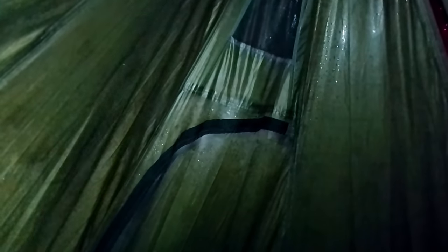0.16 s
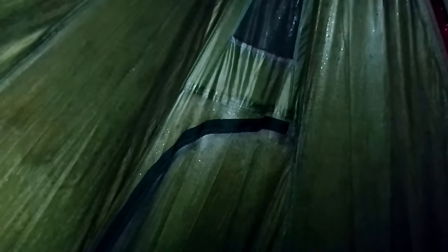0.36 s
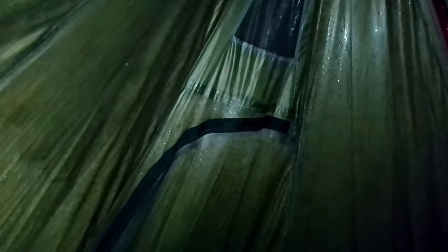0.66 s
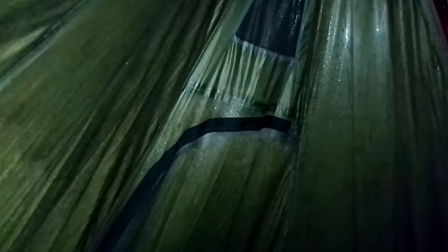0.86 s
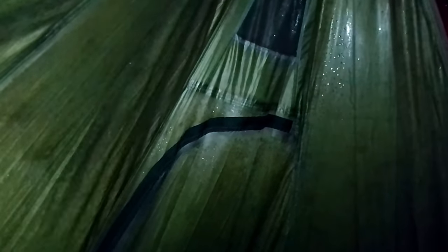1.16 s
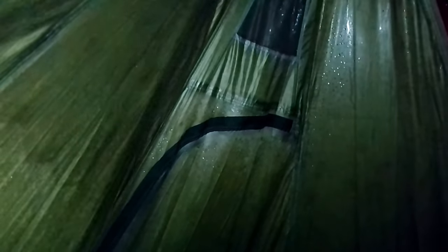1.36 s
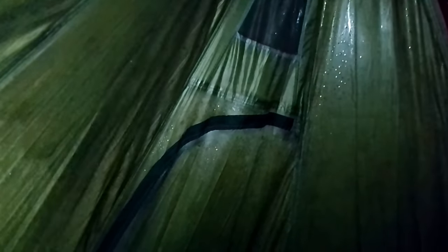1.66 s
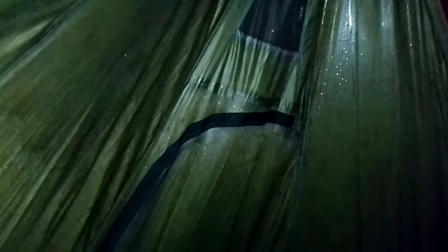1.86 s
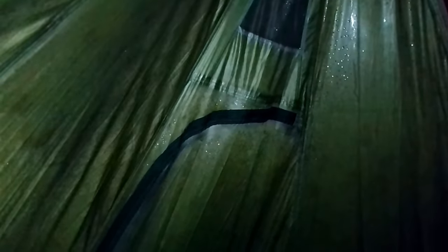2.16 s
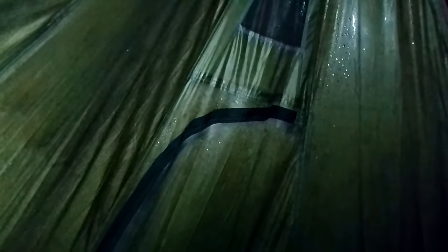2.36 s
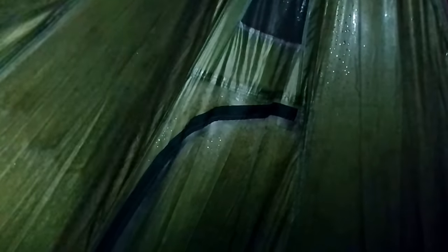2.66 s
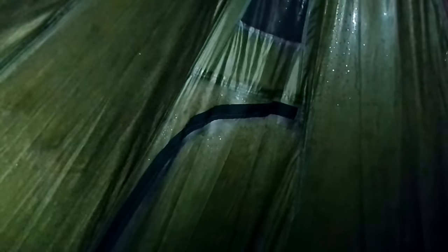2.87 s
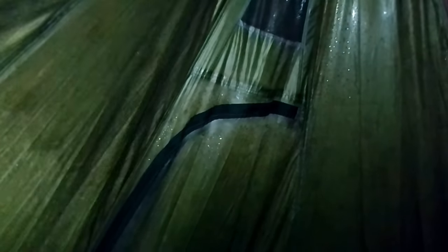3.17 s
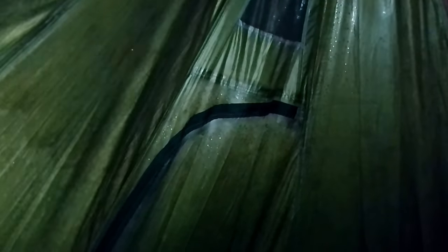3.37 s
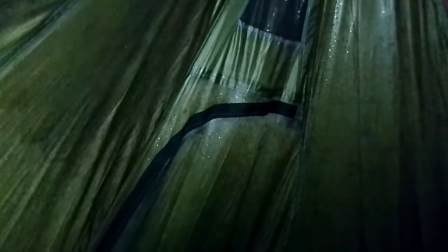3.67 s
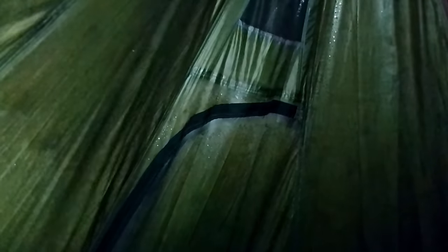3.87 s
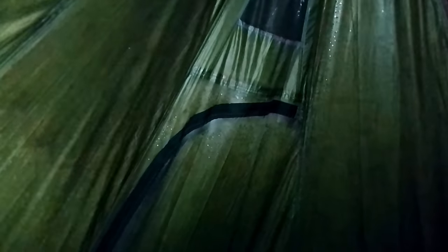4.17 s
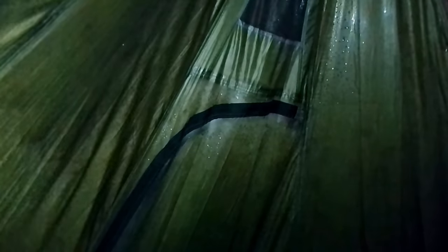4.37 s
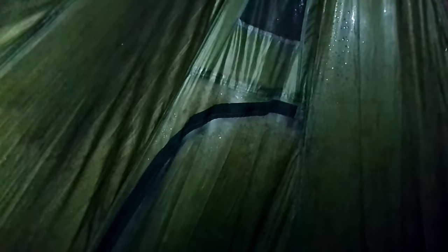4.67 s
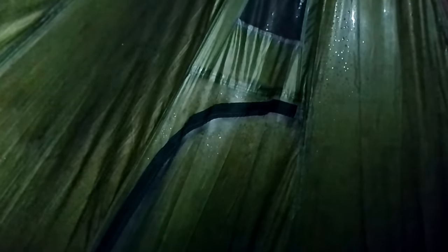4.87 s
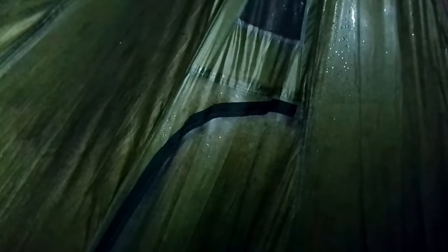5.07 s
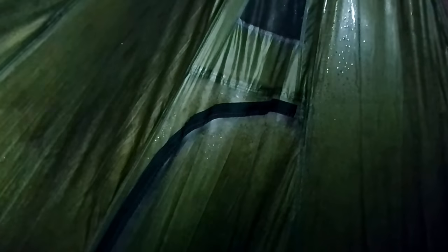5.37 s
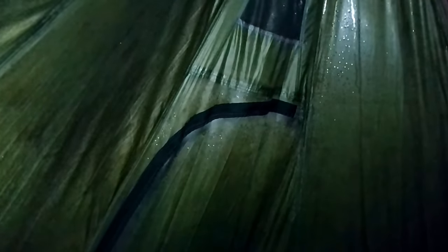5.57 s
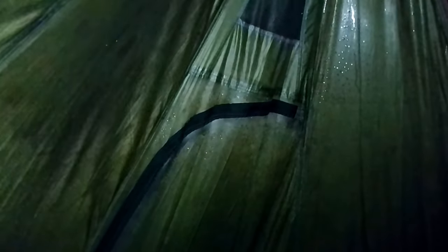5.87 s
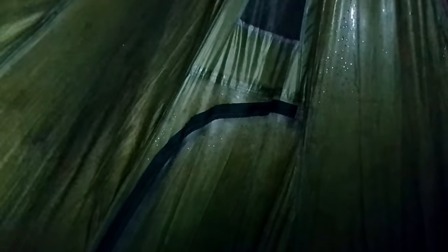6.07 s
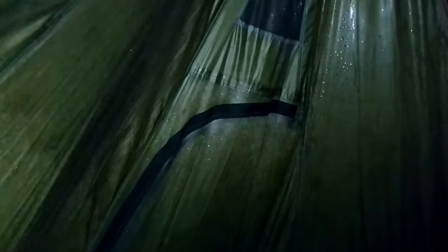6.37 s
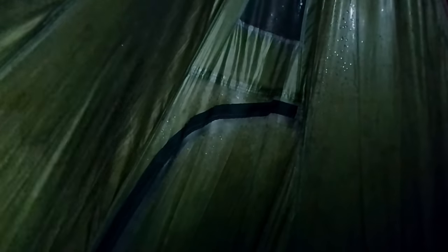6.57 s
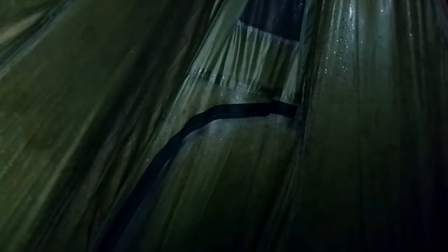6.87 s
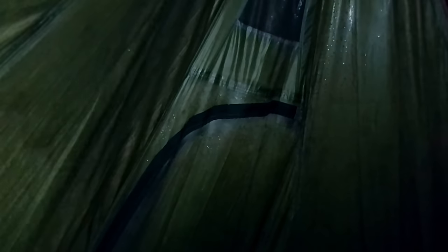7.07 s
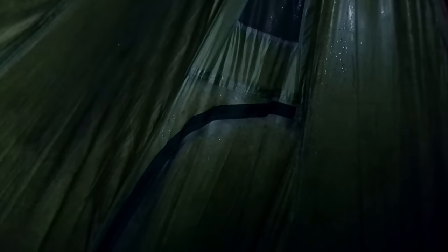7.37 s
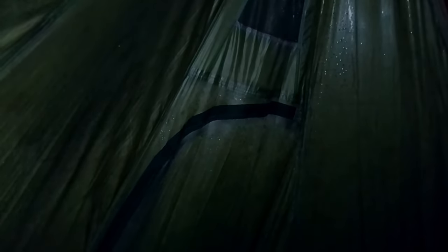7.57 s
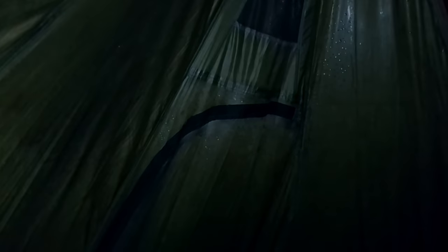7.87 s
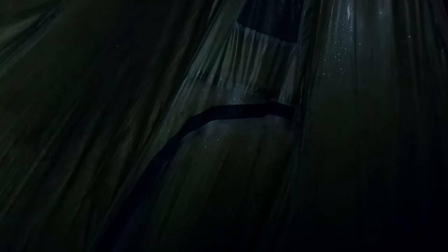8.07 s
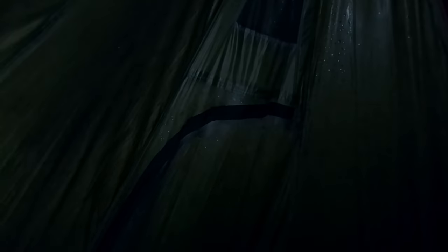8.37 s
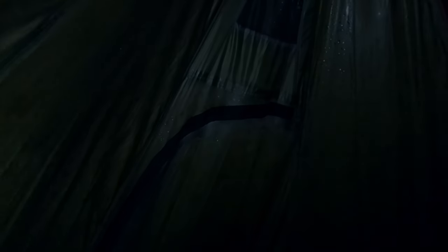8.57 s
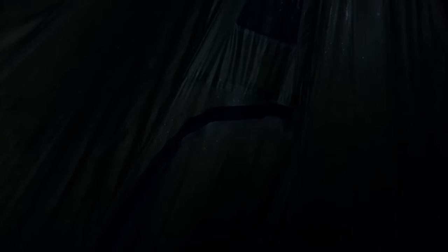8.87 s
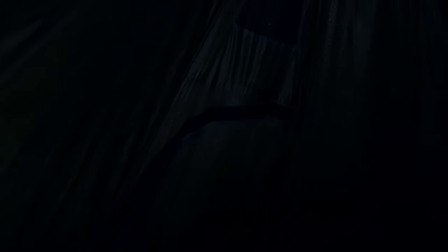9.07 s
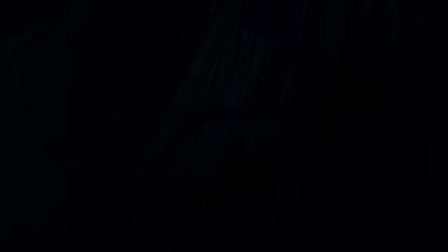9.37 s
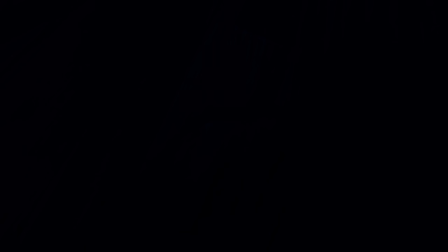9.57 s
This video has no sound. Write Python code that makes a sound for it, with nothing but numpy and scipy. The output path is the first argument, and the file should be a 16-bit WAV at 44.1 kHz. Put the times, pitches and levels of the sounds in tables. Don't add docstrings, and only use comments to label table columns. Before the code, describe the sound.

Inside a tent at night, stiff nylon walls crinkle, pop and crack in gusts above a soft distant wind roar, ending in a fade.

```python
import sys
import numpy as np
from scipy import signal
from scipy.fft import rfft, irfft
from scipy.io import wavfile
from scipy.ndimage import uniform_filter1d

SR = 44100
rng = np.random.default_rng(int(sys.argv[2]) if len(sys.argv) > 2 else 0)


def put_to_file(sound):
    columns = np.atleast_2d(sound).T
    safe = np.clip(columns, -1, 1)
    whole_steps = np.round(safe * 32767)
    wavfile.write(sys.argv[1], SR, whole_steps.astype(np.int16))


def invert_db(level):
    return 10 ** (np.asarray(level, dtype=float) / 20)


N = 429093


def evened(x):
    return x / np.sqrt(np.mean(x ** 2) + 1e-20)


def peaked(x):
    return x / (abs(x).max() + 1e-20)


def read(points, hz):
    f, value = np.transpose(points)
    return np.interp(np.log(hz + 1), np.log(f + 1), value)


def curve(points):
    s, db = np.transpose(points)
    return np.interp(np.arange(N) / SR, s, db)


def equalized(x, spectrum):
    gain = invert_db(read(spectrum, np.fft.rfftfreq(len(x), 1 / SR)))
    return irfft(rfft(x) * gain, len(x))


def colour(x, spectrum):
    return evened(equalized(x, spectrum))


def ring(x, hz, width):
    r = np.exp(-np.pi * width / SR)
    return signal.lfilter([1, -1], [1, -2 * r * np.cos(2 * np.pi * hz / SR), r * r], x)


def band(x, lo_hz, hi_hz):
    edges = [lo_hz, np.clip(hi_hz, 1.1 * lo_hz, 20000)]
    return peaked(signal.sosfilt(signal.butter(2, edges, "band", fs=SR, output="sos"), x))


def highpassed(x, hz):
    return signal.sosfilt(signal.butter(2, hz, "high", fs=SR, output="sos"), x)


def decay(t, t60):
    return invert_db(-60 * t / t60)


def add(mix, s, sound):
    part = mix[round(s * SR):][:len(sound)]
    part += sound[:len(part)]


def turbulence(spectrum, patchy_db, size=1024):
    frames, hz = 4 * N // size + 5, np.fft.rfftfreq(size, 1 / SR)
    a, b, patches = rng.standard_normal((frames, len(hz), 3)).T
    patches = uniform_filter1d(patches, size=10, axis=0)
    patches = evened(uniform_filter1d(patches, size=12, axis=1))
    z = (a + 1j * b) * invert_db(read(spectrum, hz)[:, None] + patchy_db * patches)
    return evened(signal.istft(z, nperseg=size, noverlap=3 * size // 4)[1][:N])


# (time [s], level [dB])
WIND_GUSTS = [(0.0, 0.5), (1.7, 1), (2.2, 2.5), (2.5, 2), (3.5, 1), (4.5, 1), (5.5, 1), (6.5, 2.5),
              (7.3, 5), (8.3, 6), (8.9, 7), (9.1, 4), (9.73, 7)]
# (time [s], swell [dB], half length [s])
CANOPY_HEAVES = [
    (0.037, 14, 0.02),
    (2.193, 2, 0.19),
    (4.2, 0.5, 0.18),
    (5.63, 5, 0.054),
    (5.754, 12, 0.19),
    (8.07, 5, 0.071),
    (8.541, 1, 0.27),
    (8.943, 11, 0.27),
]
# (frequency [Hz], level [dB per Hz])
ROAR_SPECTRUM = [(250, -24.5), (430, -3.5), (550, -6), (603, -3.5), (1140, -1), (1790, -4), (2030, -6),
                 (3090, -14.5), (3350, -17.5), (5000, -24.5), (6500, -34), (11000, -120)]
# (frequency [Hz], level [dB per Hz])
BOOM_SPECTRUM = [(97, -64), (165, -37.5), (186, -17), (242, -1), (339, 3), (453, -10), (480, -17.5),
                 (620, -34.5), (1060, -120)]
# (frequency [Hz], level [dB per Hz])
RUMBLE_SPECTRUM = [(18, -47.5), (30, -17), (68, 2.5), (102, 8), (124, -11), (160, -23.5), (210, -25),
                   (350, -120)]


def wind():
    t, gust = np.arange(N) / SR, curve(WIND_GUSTS)
    heave = sum(db * np.clip(1 - abs(t - s) / half, 0, 1) for s, db, half in CANOPY_HEAVES)
    roar = invert_db(-64 + gust) * turbulence(ROAR_SPECTRUM, patchy_db=1.36)
    boom = turbulence(BOOM_SPECTRUM, patchy_db=1.74, size=4096)
    boom = boom * invert_db(-72 + 1.04 * gust + heave)
    rumble = turbulence(RUMBLE_SPECTRUM, patchy_db=2.0, size=4096)
    rumble = rumble * invert_db(-91.5 + 0.47 * gust + 0.48 * heave)
    return roar + boom + rumble


def flap(peak_db, hz, t60):
    t = np.arange(SR // 4) / SR
    onset = 1 - np.exp(-t / 0.0011)
    return invert_db(peak_db) * decay(t, max(t60, .01)) * onset * np.sin(2 * np.pi * hz * t)


# (time [s], peak [dB], frequency [Hz], t60 [s])
CANOPY_FLAPS = [(2.026, -50.5, 320, 0.059), (5.596, -67, 588, 0.086), (5.763, -38, 338, 0.037),
                (6.301, -65, 330, 0.095), (7.651, -64, 385, 0.11), (8.336, -40.5, 296, 0.084),
                (8.739, -35.5, 336, 0.032), (8.874, -33.5, 322, 0.029), (5.758, -51.5, 126, 0.084),
                (8.328, -60, 86.1, 0.079), (8.868, -65.5, 75.4, 0.077)]


def flaps():
    out = np.zeros(N)
    for s, *row in CANOPY_FLAPS:
        add(out, s + 0.0042, flap(*row))
    return out


# (start [s], end [s], frequency [Hz], level [dB])
SEAM_HUMS = [
    (2.051, 2.207, 2890, -73),
    (5.8, 6.45, 3350, -76.5),
    (8.34, 8.82, 275, -58),
]


def seams():
    out = np.zeros(N)
    for start, end, hz, db in SEAM_HUMS:
        size = round((end - start) * SR)
        hum = evened(ring(rng.standard_normal(SR)[:size], hz, 37))
        add(out, start, invert_db(db) * signal.windows.tukey(size, .3) * hum)
    return out


def grains(per_s, spread_db, t60, clump_db):
    clumps = evened(uniform_filter1d(rng.standard_normal(N), size=500))
    size = invert_db(spread_db * np.minimum(rng.exponential(1, N), 3) + clump_db * clumps)
    hits = size * (rng.random(N) < per_s / SR)
    puffs = signal.lfilter([1], [1, -invert_db(-60 / (t60 * SR))], hits)
    return evened(puffs * rng.standard_normal(N))


# (time [s], level [dB])
SLIDE_LEVEL = [(0.0, -63), (0.34, -61.5), (0.5, -65), (0.85, -61.5), (1.2, -65.5), (1.95, -70),
               (2.13, -64.5), (2.35, -68.5), (2.7, -65), (3.1, -66), (5.4, -71.5), (5.58, -60.5),
               (6.36, -65.5), (7.0, -68), (7.6, -51), (8.03, -61.5), (8.32, -67), (9.73, -62.5)]
# (frequency [Hz], level [dB per Hz])
RUSTLE_SPECTRUM = [(2940, -27.5), (5000, -13.5), (6140, -9.5), (9190, 2.5), (9710, 1.5), (12200, -6.5),
                   (15100, -10), (16000, -13), (16200, -39), (16500, -46)]
# (frequency [Hz], level [dB per Hz])
SCRAPE_SPECTRUM = [(2000, -10.5), (3000, 0), (5500, -4), (7000, -4), (12000, -29.5), (16000, -48)]


def rustle():
    gust, slide = curve(WIND_GUSTS), curve(SLIDE_LEVEL)
    slips = grains(per_s=670, spread_db=6.0, t60=0.012, clump_db=3.5)
    slips = slips * invert_db(-0.73 * gust)
    fine = colour(slips + 1.1 * rng.standard_normal(N), RUSTLE_SPECTRUM)
    coarse = colour(0.57 * slips + 0.85 * rng.standard_normal(N), SCRAPE_SPECTRUM)
    coarse_db = -77 + 0.64 * (slide - np.median(slide)) + 0.57 * gust
    return invert_db(slide - 4.0) * fine + invert_db(coarse_db) * coarse


def drag_slips():
    streams = [[(5500, 0), (8500, -30)],
               [(5500, -30), (8500, 0), (12000, -30)],
               [(8500, -30), (12000, 0)]]
    hz = np.fft.rfftfreq(N, 1 / SR)
    shares = [invert_db(read(s, hz)) for s in streams]
    shared = grains(per_s=530, spread_db=1.0, t60=0.015, clump_db=-4.0)
    mixed = 0
    for share in shares:
        own = grains(per_s=1500, spread_db=-4.0, t60=0.03, clump_db=2.5)
        mixed = mixed + rfft(own + 0.19 * shared) * share
    slips = irfft(mixed / np.sqrt(sum(s ** 2 for s in shares)), N)
    wash = colour(rng.standard_normal(N), [(2500, 0.0), (5000, -3)])
    return slips + 0.65 * wash


# (start [s], rise [s], hold [s], level [dB], fall [dB per s])
WALL_DRAGS = [(5.592, 0.0046, .01, -54.5, 65.5), (5.696, 0.077, 0.017, -52, 81.5),
              (7.08, 0.07, 0.19, -43, 150), (7.35, 0.068, 0.095, -46.5, 90), (8.38, 0.037, 0.053, -53, 111),
              (8.876, 0.0085, 0.066, -53, 62), (8.885, 0.017, 0.029, -49.5, 300),
              (2.51, 0.026, 0.21, -67, 120), (6.31, 0.022, 0.081, -63, 82), (5.77, .004, 0.02, -47, 201),
              (8.882, 0.0087, 0.11, -57, 67), (5.85, 0.025, 0.16, -63.5, 36), (6.16, .02, .1, -80, 60),
              (8.95, .02, 0.1, -71, 61), (5.39, .01, 0.19, -65, 51)]
DRAGGED_WALL = (0, 0, 1, 2, 3, 4, 3, 6, 3, 3, 5, 3, 3, 3, 3)
# (frequency [Hz], level [dB per Hz])
WALL_TONES = [
    [(350, -54.5), (600, -26), (858, 6), (1700, -13), (2370, -6), (3350, -7), (3900, -25.5), (6200, -19),
     (9620, -1.5), (13000, -14.5), (16000, -25)],
    [(2240, -18), (3800, -16), (4390, -10.5), (4980, -12), (5600, -5), (6000, -1), (6930, -0.5),
     (9040, 3.5), (10700, 0), (11100, -12), (12000, -13), (12400, -2), (13800, -15), (14300, -7),
     (15400, -9), (16000, -17)],
    [(2940, -28), (5000, -26), (7300, -19), (9000, 7), (11000, -14), (15100, -28), (16000, -30)],
    [(3530, -47.5), (6000, -15), (7300, -20), (7600, 0.5), (9420, 7), (10200, 2), (11100, -1.5),
     (12600, -6), (16000, -23)],
    [(350, -51), (600, -12), (930, 4.5), (1140, -3), (1350, -5.5), (1830, 0), (2240, -22), (2720, -16.5),
     (4840, -19), (6030, -9), (7400, -25.5), (9110, -13), (11300, -13.5), (16000, -27)],
    [(350, -45), (700, -3), (1000, 4), (1900, -3), (2400, -17), (5000, -34), (16000, -48)],
    [(4000, -27), (5000, 2), (6500, -5), (7200, -8), (9200, -2), (12000, -10), (16000, -22)],
]


def drags():
    slips, out = drag_slips(), np.zeros(N)
    for (s, rise, hold, db, fall), wall in zip(WALL_DRAGS, DRAGGED_WALL):
        part = slips[round(s * SR):][:SR // 2]
        t = np.arange(len(part)) / SR
        pull = np.clip(t / max(rise, .001), 0, 1) ** 2
        pull = pull * invert_db(db - fall * np.maximum(t - rise - hold, 0))
        release = np.clip(10 - 20 * t, 0, 1)
        add(out, s, pull * release * colour(part, WALL_TONES[wall]))
    return highpassed(out, 400)


def facets(x, ripple_db):
    z = signal.stft(x, nperseg=512, noverlap=384)[2]
    ripple = uniform_filter1d(rng.standard_normal(z.shape[::-1]).T, size=3, axis=0)
    ripple = invert_db(ripple_db * evened(uniform_filter1d(ripple, size=60, axis=1)))
    return signal.istft(z * evened(ripple), nperseg=512, noverlap=384)[1][:N]


def drum(peak_db, low_hz, high_hz, high_db, t60, noise):
    t = np.arange(len(noise)) / SR
    blow = band(decay(t, 0.0088) * (0.51 + noise), 530, 5200)
    shiver = 0.52 * band(decay(t, 0.045) * noise[::-1], 600, 2700)
    width = 2.0 / max(t60, .004)
    low = peaked(ring(blow, low_hz, width))
    high = invert_db(high_db) * peaked(ring(blow, high_hz, 1.7 * width))
    return invert_db(peak_db - 9.5) * (shiver + low + high)


# (time [s], peak [dB], lower mode [Hz], upper mode [Hz], upper re lower mode [dB])
WALL_DRUMS = [(0.7265, -35, 1540, 3630, 0), (0.9149, -25, 1280, 2000, -13), (1.9569, -44, 830, 1350, 13.5),
              (2.0288, -42, 750.6, 1660, 8), (2.5022, -41.5, 905, 1800, -4), (2.6057, -39.5, 1190, 2370, 9),
              (3.4485, -40.5, 1990, 3520, 7), (5.3798, -40.5, 1190, 1690, 12.5),
              (5.6, -18.5, 875, 2840, -1.5), (5.623, -37, 1010, 1500, -19), (5.7674, -34.5, 970, 3300, 18),
              (6.1454, -35, 1190, 1210, -4), (6.3045, -31, 1250, 2200, -14), (6.313, -38.5, 1110, 1980, 2),
              (6.3222, -34.5, 1310, 2200, -12), (6.632, -33.5, 790, 1620, -6),
              (7.6531, -32.5, 828, 1540, -1), (8.337, -29.5, 1180, 1360, 4), (8.7412, -31, 800, 1502, -9),
              (8.8775, -16.5, 935, 1306, 4.5)]


def drums():
    out = np.zeros(N)
    for (s, *row), noise in zip(WALL_DRUMS, rng.standard_normal((len(WALL_DRUMS), 4000))):
        add(out, s + 0.0006, drum(*row, t60=0.018, noise=noise))
    return out


def ping(peak_db, hz, t60, noise):
    blow = decay(np.arange(len(noise)) / SR, max(t60, .01)) * noise
    return invert_db(peak_db) * peaked(ring(ring(blow, hz, 650), hz, 650))


# (time [s], peak [dB], frequency [Hz], t60 [s])
FACET_PINGS = [(0.7272, -50.5, 5230, 0.093), (0.918, -50, 2490, 0.13), (2.0283, -48, 2940, .03),
               (2.0275, -42, 9600, .04), (2.5445, -48, 5440, 0.028), (2.569, -50, 5140, .03),
               (3.45, -64, 6150, .04), (5.393, -46, 9500, .08), (5.6002, -31, 7900, .1),
               (5.5982, -37, 10300, .05), (5.699, -46, 8800, 0.034), (5.7673, -37, 1620, 0.062),
               (5.7668, -32, 5930, .04), (5.7668, -25.5, 7070, .05), (5.7668, -21, 7900, .04),
               (5.7681, -29, 9640, 0.045), (5.7668, -26, 10520, .1), (5.7676, -25.5, 11500, .07),
               (5.9733, -51.5, 4700, 0.036), (6.0791, -51, 6870, 0.034), (6.078, -40, 10200, 0.035),
               (6.0786, -51, 4200, 0.026), (6.145, -38, 10400, 0.044), (6.3046, -50, 5940, 0.046),
               (6.3555, -53.5, 4530, 0.045), (6.3555, -56, 11900, 0.035), (7.221, -33.5, 6120, .04),
               (7.1991, -37, 6400, .04), (7.654, -48, 3870, .05), (7.666, -48.5, 3700, 0.028),
               (7.667, -43, 8500, 0.05), (8.337, -35, 9560, 0.042), (8.337, -36, 7370, 0.037),
               (8.5435, -49, 7850, .03), (8.741, -40, 4420, 0.027), (8.7415, -38, 7100, 0.035),
               (9.0833, -41.5, 11280, .03), (8.8777, -39.5, 3080, 0.035), (8.877, -44, 5800, 0.25)]


def pings():
    out = np.zeros(N)
    for (s, *row), noise in zip(FACET_PINGS, rng.standard_normal((len(FACET_PINGS), 6000))):
        add(out, s + 0.0007, ping(*row, noise))
    return out


CLICK = 5.58


def crackle(peak_db, hz, noise):
    t = np.arange(len(noise)) / SR
    burst = CLICK / 2 * (t == 0) + invert_db(-0.5) * decay(t, 0.024) * noise
    facet = peaked(ring(burst, hz, 1600)) + 0.4 * peaked(ring(burst, 9500, 4000))
    return invert_db(peak_db - 4.5) * band(facet, 0.63 * hz, 12500)


# (time [s], peak [dB], brightest
# [Hz])
WALL_CRACKLES = [(0.194, -49, 9480), (0.2024, -43, 9250), (0.2643, -46, 7980), (0.3163, -43, 6770),
                 (0.4209, -44, 9470), (0.4574, -48, 9890), (0.5028, -47, 9310), (0.6786, -42, 9200),
                 (0.7517, -36, 9500), (0.9537, -41, 8600), (0.9882, -45, 9720),
                 (1.0041, -42.5, 11300), (1.207, -46, 9810), (1.3299, -53, 9180), (1.4007, -46, 9210),
                 (1.4333, -46, 9900), (1.5483, -45, 9800), (1.6571, -50, 8470), (1.709, -47, 8590),
                 (1.8814, -59, 9530), (2.1126, -45, 9330), (2.1236, -41.5, 7560), (2.2364, -46, 9640),
                 (2.2463, -37, 9600), (2.3124, -53, 8340), (2.34, -48, 10000), (2.5024, -39, 10400),
                 (2.5434, -33, 7550), (2.5504, -39, 7570), (2.6564, -42, 10000), (2.694, -47, 5360),
                 (2.7117, -48, 9750), (2.7561, -49, 9660), (2.794, -44.5, 8800), (2.822, -50, 9020),
                 (2.8429, -45, 9610), (2.876, -44, 5600), (2.9452, -46, 9230), (3.431, -49, 8850),
                 (3.6114, -49, 8980), (3.7998, -51, 9470), (3.8162, -47, 8760), (3.8985, -44.5, 7170),
                 (3.9275, -49, 7930), (3.983, -46, 9810), (4.0682, -58, 7510), (4.1659, -50, 10200),
                 (4.366, -55, 9150), (4.4338, -52, 8040), (4.4574, -53, 9980), (4.561, -48, 10300),
                 (4.8389, -49, 9500), (4.8728, -51, 8940), (5.256, -55, 8930),
                 (5.5049, -47, 8790), (5.5697, -47, 7800), (5.67, -42, 8770), (5.7704, -20, 7980),
                      (5.8014, -35, 10200), (5.8374, -35, 9810), (5.963, -36, 9080), (6.2257, -45, 10200),
                      (6.2906, -52, 8980), (6.3124, -37, 7980), (6.3254, -39, 8690), (6.4144, -41.5, 8660),
                      (6.4827, -42, 10200), (6.5096, -50, 9170), (6.56, -49, 9270), (6.6169, -45, 10100),
                      (7.1204, -24, 8600), (7.163, -25, 7400), (7.1724, -29, 8660), (7.1934, -29, 10100),
                      (7.2114, -27, 10200), (7.2164, -23, 8960), (7.2364, -35, 9010), (7.2524, -25, 9170),
                      (7.2744, -31, 9260), (7.2884, -26, 8880), (7.312, -27, 7340), (7.3244, -23, 8100),
                      (7.3394, -27, 8850), (7.3504, -25, 8800), (7.3564, -27, 9100), (7.4054, -25, 8700),
                      (7.9099, -42, 10100), (7.9713, -49, 9000), (8.3404, -26, 9460), (8.3913, -39, 9500),
                      (8.4194, -41, 10100), (8.4362, -32, 9800), (8.4577, -35, 10800), (8.4851, -37, 10800),
                      (8.5131, -37, 9400), (8.5435, -41, 9360)]


def crackles():
    out = np.zeros(N)
    rows = WALL_CRACKLES
    for (s, *row), noise in zip(rows, rng.standard_normal((len(rows), 1500))):
        add(out, s + 0.0007, crackle(*row, noise))
    return out


# (frequency [Hz], level [dB], t60 [s])
PANEL_MODES = [(700, -6, .03), (920, -1, .04), (1290, -1, .04), (1650, -3, .03), (2150, -4, .03),
               (2600, -8, .015)]


def snap(peak_db, thud_db, scrape_db, hz, t60, chance):
    t, (noise, slips, wash) = np.arange(chance.shape[1]) / SR, chance
    t60 = max(t60, .004)
    re_slips = (abs(slips) > 2.0) * abs(noise)
    after = invert_db(-1.5) * decay(t, t60) * signal.lfilter([1], [1, -.95], re_slips) * wash
    crack = CLICK * (t == t[24]) + invert_db(-6.5) * decay(t, 0.0087) * (t > t[16]) * noise
    burst = crack + after + invert_db(-16.5) * decay(t, 2.8 * t60) * noise[::-1]
    detune = (0, *slips[-3:].clip(-1, 1))
    patch = sum(peaked(ring(burst, hz * (1 + 0.058 * k), 1700)) for k in detune)
    bright = band(band(patch, 0.91 * hz, 3.9 * hz), 0.52 * hz, 11800)
    wide = invert_db(-22.0) * band(crack + 0.24 * after, 4200, 20000)
    scrape = invert_db(scrape_db + 5.0) * band(crack + 0.51 * after, 2200, 7000)
    tune = 1 + 0.096 * noise[-len(PANEL_MODES):]
    blow = signal.lfilter([1], [1, -.6], crack + 0.15 * after)
    thud = sum(invert_db(db) * peaked(ring(blow, f * k, 2.5 / mode_t60))
               for (f, db, mode_t60), k in zip(PANEL_MODES, tune))
    return invert_db(peak_db) * (bright + wide + scrape + invert_db(thud_db) * peaked(thud))


# (time [s], peak [dB], thud re peak [dB], scrape re peak [dB], brightest [Hz])
CREASE_SNAPS = [(7.2225, -25.5, -38, -36, 6440), (0.7272, -45.5, -26, 1.5, 10800),
                (0.8724, -34, -13, -14, 7300), (0.9148, -29, -20, -22, 8600), (1.957, -44.5, 3, -1.5, 7060),
                (2.0283, -29, -12, -12, 7740), (2.4912, -30.5, -20, -14, 8450),
                (2.5366, -37, -24, -15.5, 8800), (2.6055, -31.5, -7.5, -22, 5850),
                (2.8769, -56.5, 10, 8, 5750), (3.4491, -41.5, -14, -4, 9400),
                (5.3792, -33.5, -14, -4, 8600), (5.449, -35.5, -33, -11.5, 9500),
                (5.6002, -19.5, -11, -54, 7900), (5.7668, -9.5, -24.5, -31, 8700),
                (6.1459, -28.5, -21, -23, 8400), (6.3046, -36.5, 3.5, -23, 8550),
                (6.6323, -33, -14, -12, 9700), (7.0768, -35, -8, -22, 8000), (7.4011, -22, -21, -22, 9100),
                (7.653, -35.5, -0.5, -15, 8100), (8.337, -25.5, -7.5, -8.5, 8300),
                (8.7415, -28.5, -13, -16, 7400), (8.8777, -24, -8, -6.5, 10350)]
# (time [s], peak [dB], scrape re peak [dB])
SLACK_WALL_TICKS = [(0.0223, -48.5, -5), (0.1072, -41.5, -13), (0.17, -44, -5.5), (0.3267, -49, -24),
                    (0.4369, -40.5, -12), (0.5252, -44.5, -15), (1.259, -43, -11), (1.5713, -41.5, -15),
                    (1.7225, -45.5, -13), (1.7858, -39.5, -13.5), (1.8991, -45, -12), (1.9734, -41, -24),
                    (2.0108, -42.5, -7), (2.0717, -45, -8), (2.1904, -41.5, -23), (2.2298, -43, -8),
                    (2.3002, -42.5, -3.5), (2.4149, -42.5, -9), (2.4548, -49, -15), (2.5676, -42.5, -12),
                    (2.7257, -43, -8.5), (2.8589, -49, -3), (2.9627, -45, -9), (3.0275, -45, -11),
                    (3.6027, -45, -19), (3.7614, -42, -13), (0.2443, -37.5, -30), (4.4717, -40.5, -25),
                    (5.2001, -47, -29), (5.5353, -44, -20)]
# (time [s], peak [dB], scrape re peak [dB])
TAUT_WALL_TICKS = [(5.699, -44, -25), (5.7084, -32, -23), (5.7304, -34, -22), (5.8272, -37, -31),
                   (5.8735, -34, -9.5), (5.8845, -36, -9), (5.9349, -37, -12), (5.9733, -36, -13),
                   (5.9046, -43, -16), (6.0791, -35.5, -27), (6.3205, -35, -25), (6.3555, -34, -16),
                   (6.4053, -40.5, -29), (6.8628, -34.5, -20.5), (7.1043, -42, -27.5), (7.1162, -23.5, -41),
                   (7.1477, -21.5, -31), (7.1692, -28, -37), (7.0654, -40, -9.5), (7.2439, -24, -28),
                   (7.2973, -27, -33), (7.438, -29, -13), (7.4854, -30, -14), (7.7233, -36.5, -24),
                   (7.2685, -25.5, -18), (5.7748, -20.5, -15.5), (7.1991, -40, -29), (9.0833, -37.5, -30),
                   (9.2209, -43, -9.5), (9.592, -38.5, -16.5)]


def creases():
    out = np.zeros(N)
    ticks = [(s, db, -10.5, scrape) for s, db, scrape in SLACK_WALL_TICKS]
    ticks += [(s, db, -22, scrape) for s, db, scrape in TAUT_WALL_TICKS]
    pitch = 8960 * (1 + 0.073 * rng.standard_normal(len(ticks)))
    rows = CREASE_SNAPS + [(*row, hz) for row, hz in zip(ticks, pitch)]
    for (s, db, thud, scrape, hz), chance in zip(rows, rng.standard_normal((len(rows), 3, 4500))):
        rattle_t60 = 0.037 + 0.11 * min(invert_db(scrape), 1)
        add(out, s + 0.00046, snap(db, thud, scrape, hz, rattle_t60, chance))
    return out


# (frequency [Hz], level [dB])
TAUT_WALL_COLOUR = [(4000, -2.5), (5500, -1), (6000, 3), (10700, -1.5), (11100, -9), (12000, -6),
                    (12400, 2), (15500, 4)]


def taut(x):
    t, start_s, end_s = np.arange(N) / SR, 7.11, 7.39
    held = np.clip(np.minimum(t - start_s, end_s - t) / .005, 0, 1)
    return x + held * (equalized(x, TAUT_WALL_COLOUR) - x)


def scene():
    air = wind() + flaps()
    fabric = seams() + rustle() + facets(drags(), ripple_db=4.0)
    ringing = drums() + pings()
    breaks = taut(crackles() + creases())
    left = 2 * (air + fabric + ringing + breaks)
    return np.array([left, 0 * left])


def low_pass(x):
    return signal.sosfilt(signal.butter(12, 16640, fs=SR, output="sos"), x)


def record(dry):
    fade_start_s, fade_end_s = 8.86, 9.736
    left_to_go = np.clip((fade_end_s - np.arange(N) / SR) / (fade_end_s - fade_start_s), 0, 1)
    faded = dry * left_to_go ** 1.05
    taps = signal.firwin(601, 15800, window=("kaiser", 7), fs=SR)  # low-pass, Hz
    limited = signal.oaconvolve(faded, taps[None], "same")
    return low_pass(limited)


dry = scene()
out = record(dry)
put_to_file(out)
```